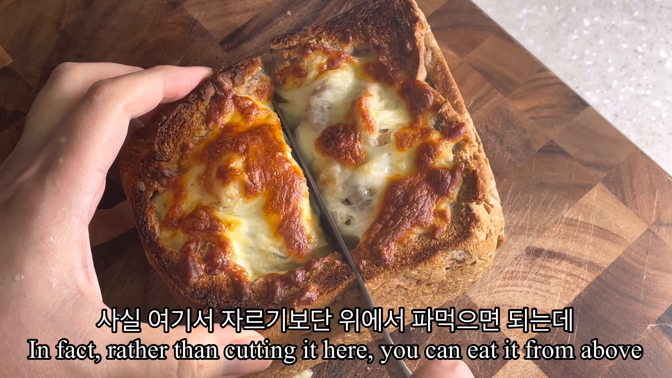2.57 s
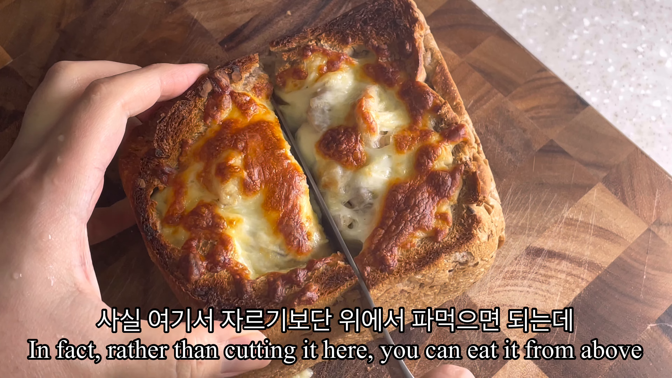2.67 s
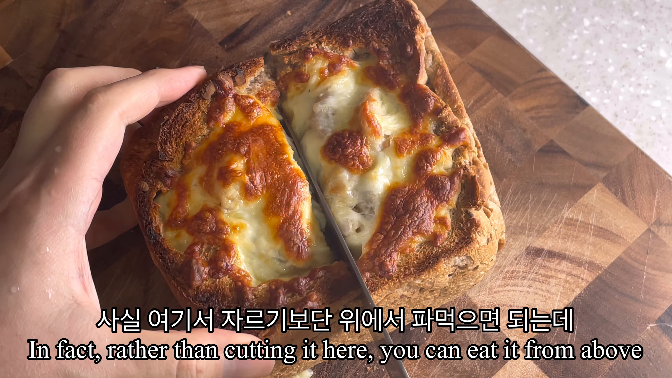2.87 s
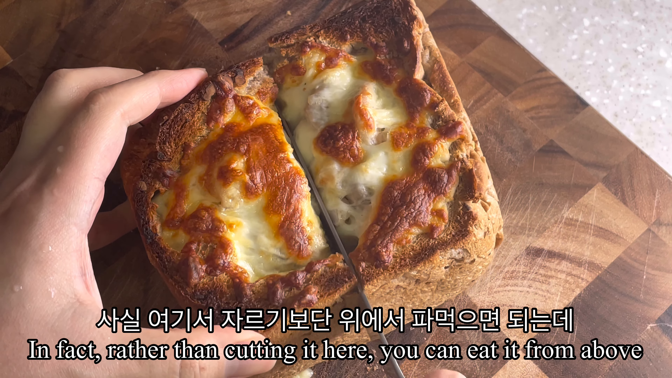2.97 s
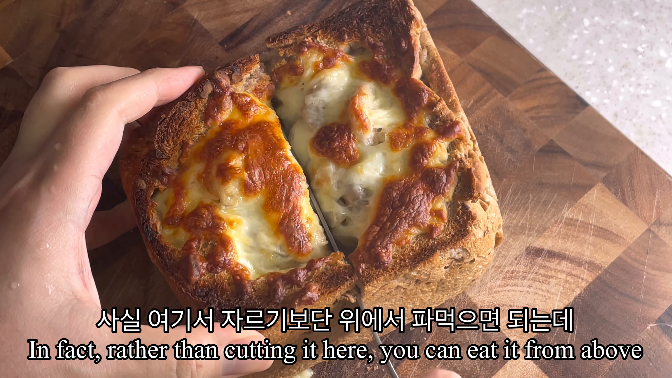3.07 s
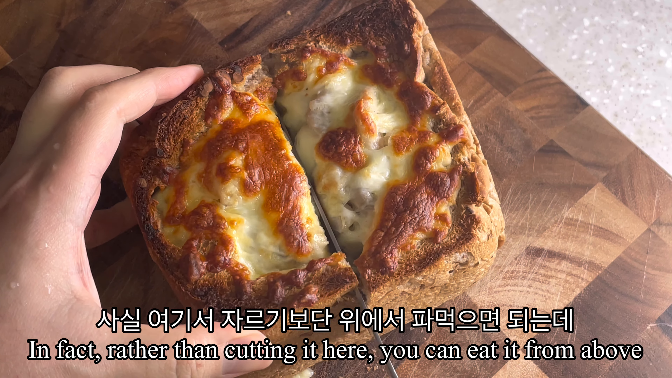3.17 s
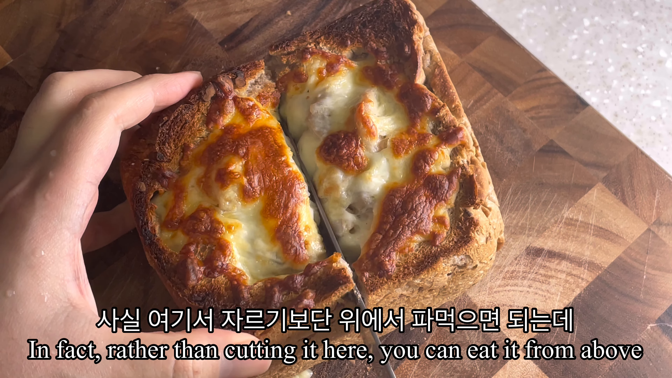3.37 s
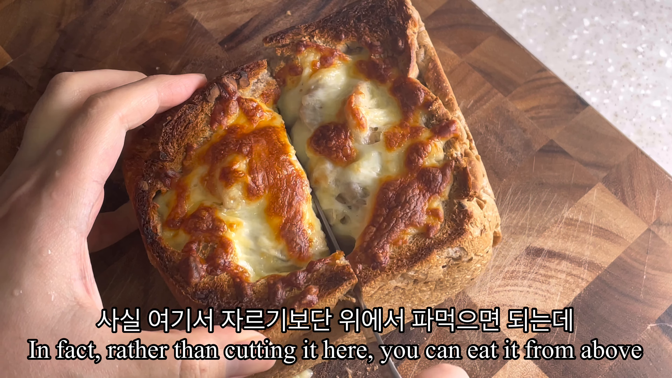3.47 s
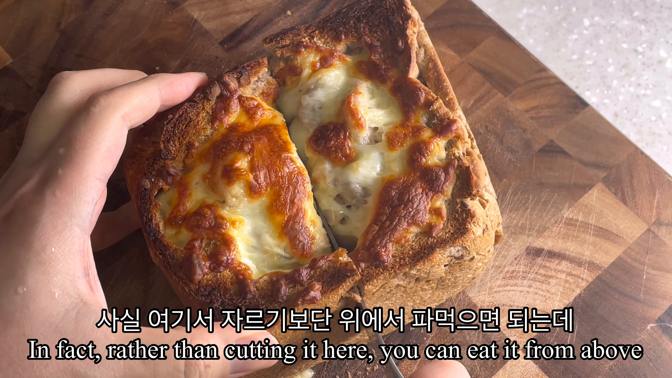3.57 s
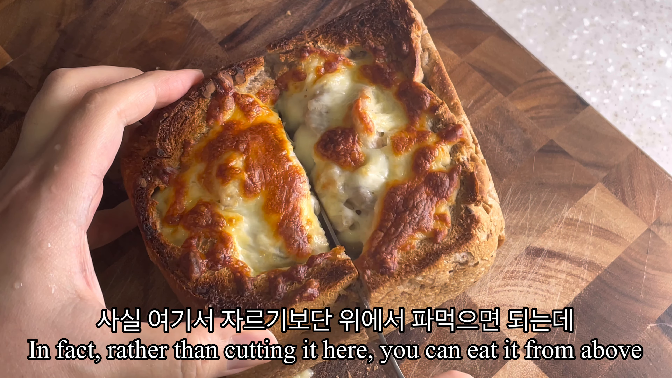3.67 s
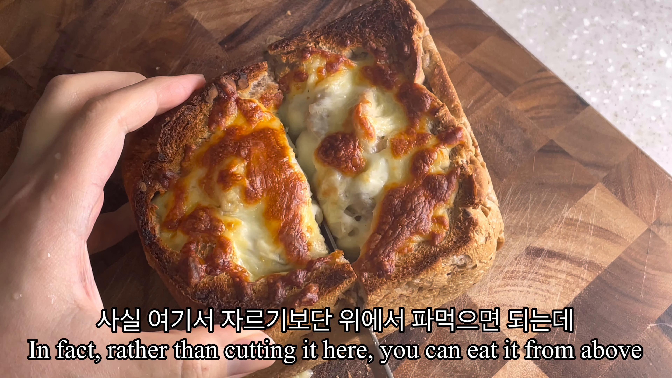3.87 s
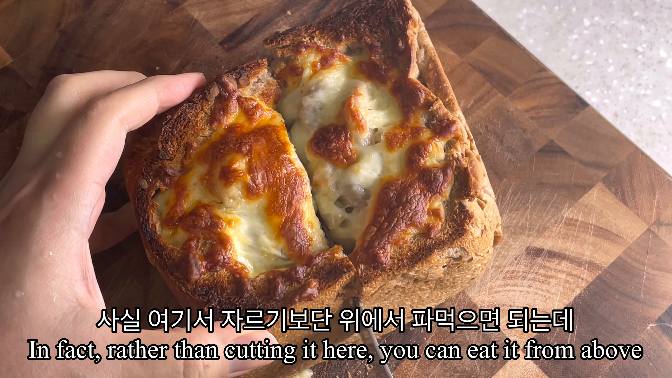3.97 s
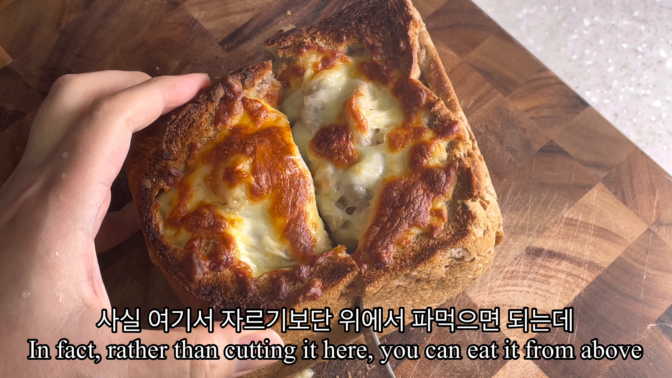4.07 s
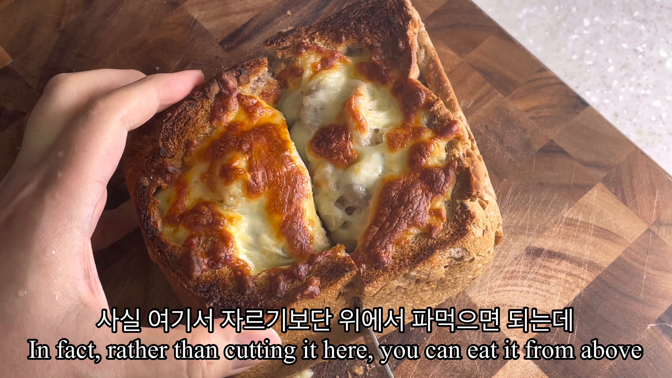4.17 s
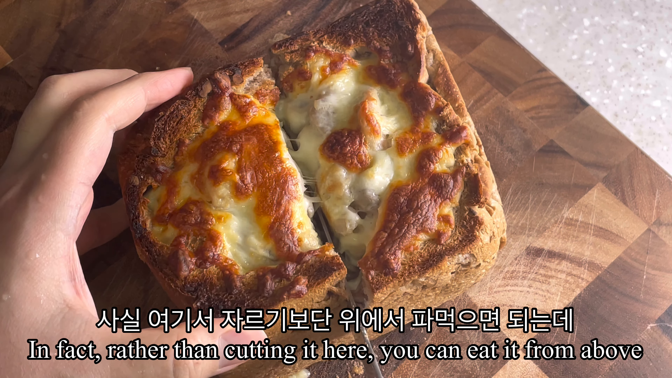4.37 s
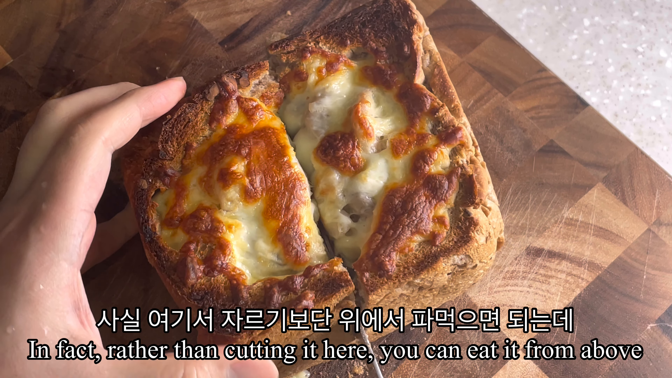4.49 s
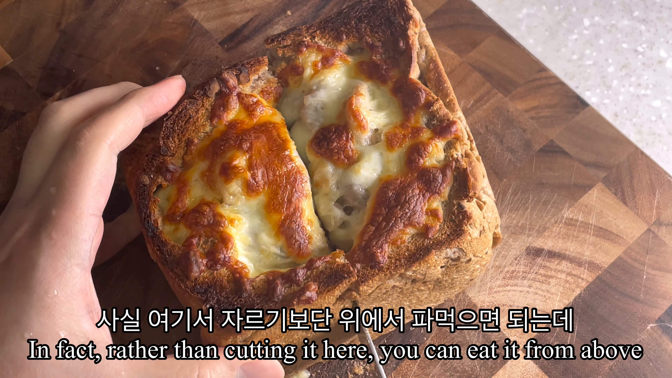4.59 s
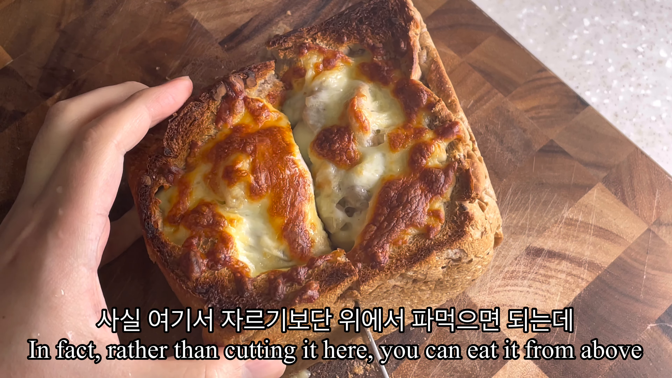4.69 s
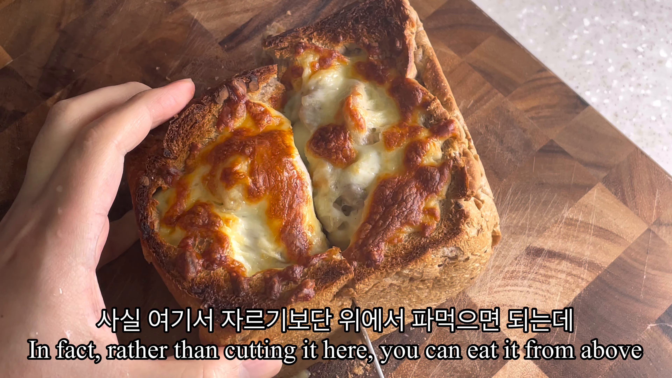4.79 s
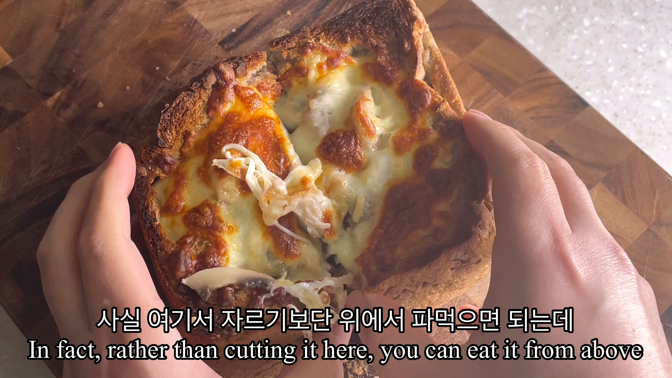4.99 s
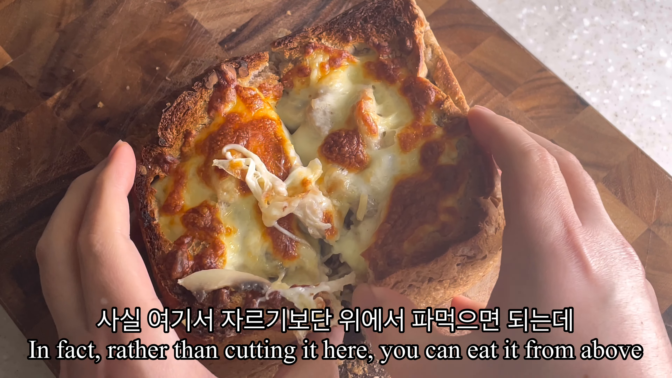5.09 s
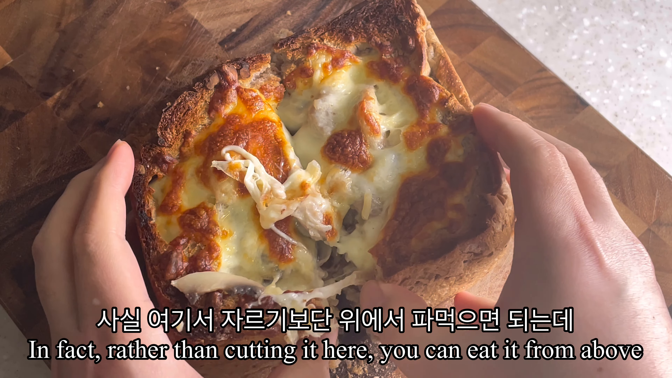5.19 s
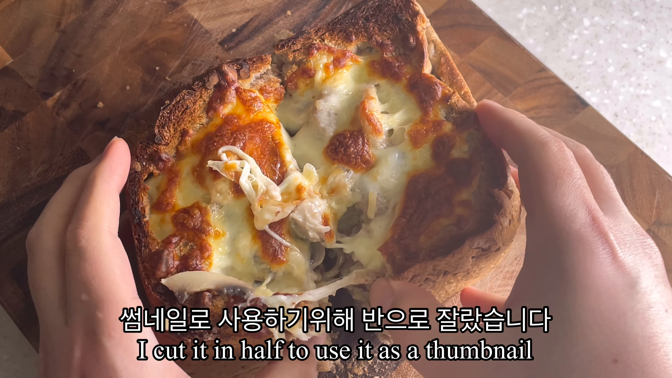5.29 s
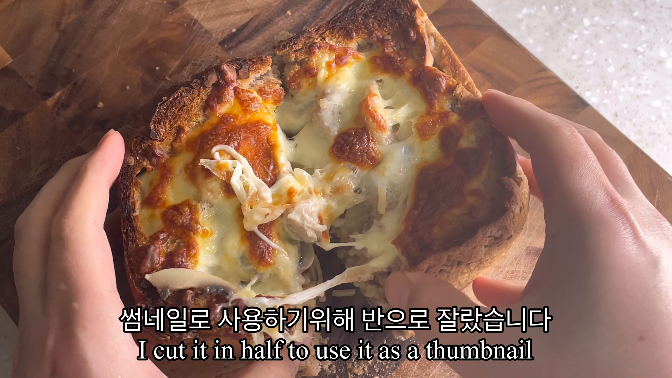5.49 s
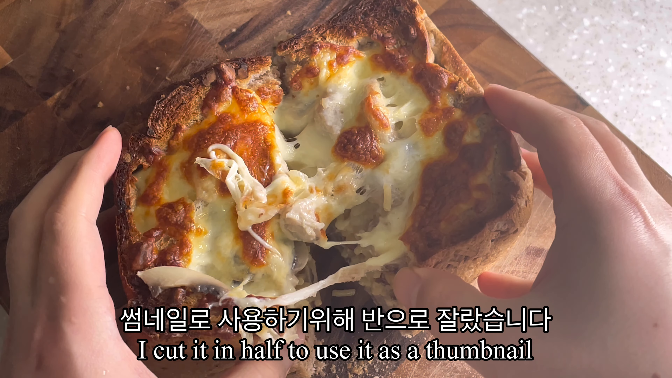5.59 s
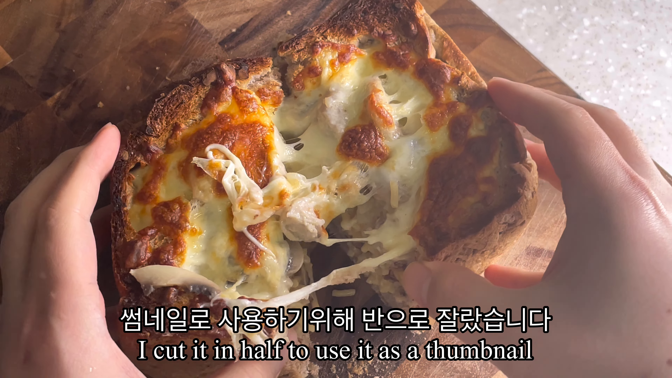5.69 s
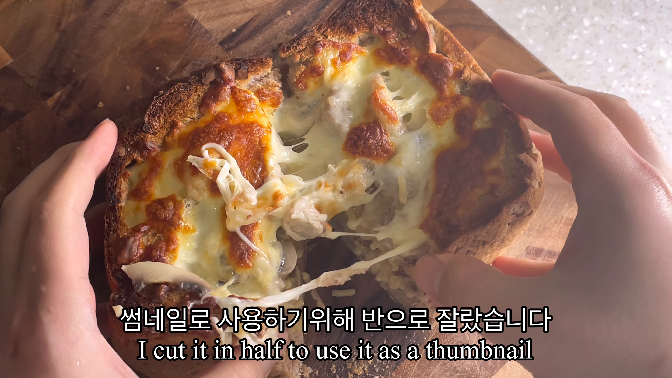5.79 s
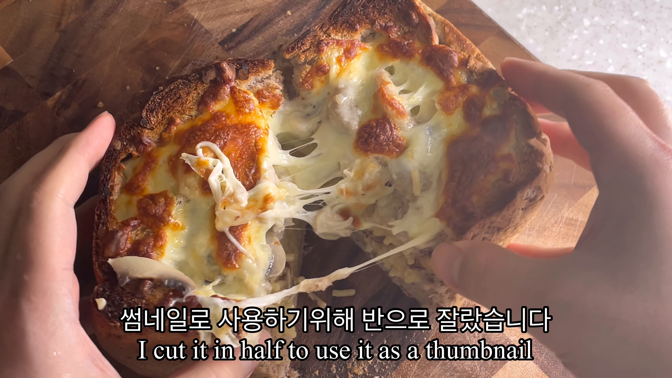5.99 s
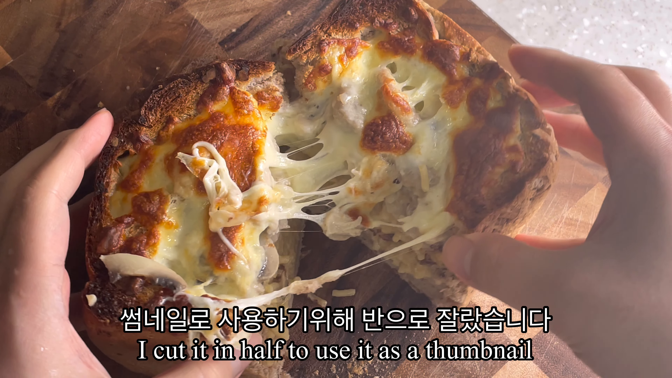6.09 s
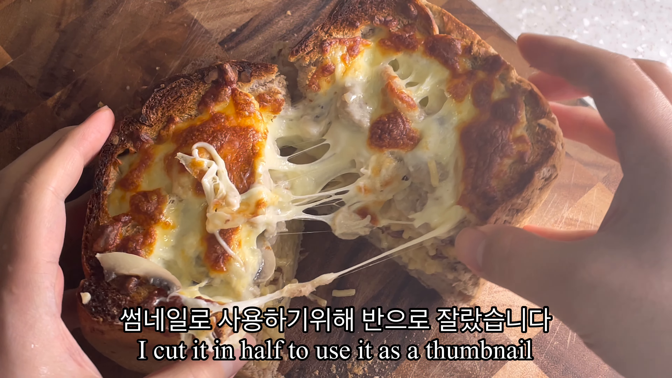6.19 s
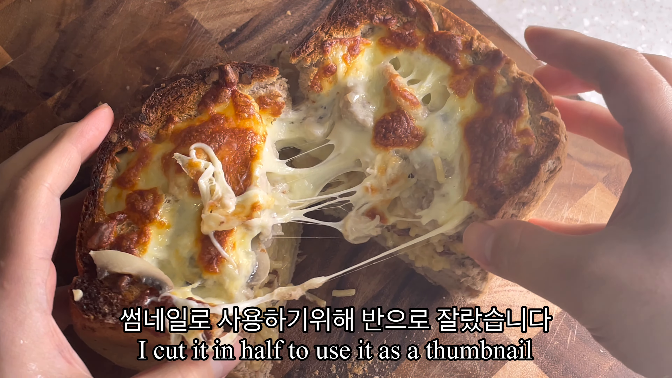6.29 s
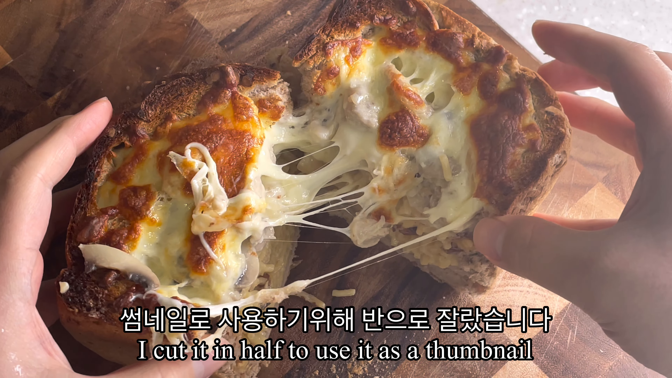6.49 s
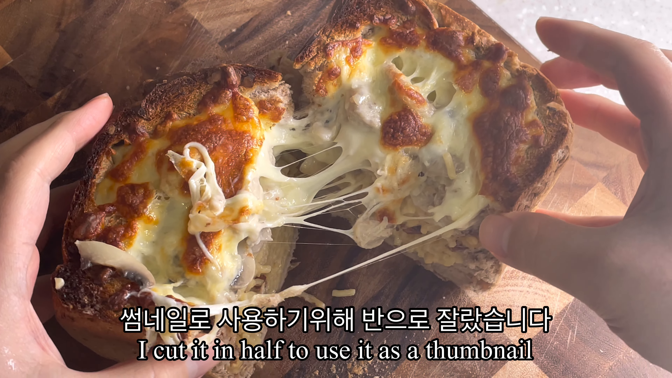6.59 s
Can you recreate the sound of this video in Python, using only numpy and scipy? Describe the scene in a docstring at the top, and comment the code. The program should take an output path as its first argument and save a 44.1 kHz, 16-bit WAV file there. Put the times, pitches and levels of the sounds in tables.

```python
"""A kitchen knife saws through the toasted crust of a cheese-filled loaf on a wooden board, close by.
First fingers rustle faintly on the loaf; the level dips briefly, then the edge ticks on the crust.
It breaks in and crunches through stroke after stroke: brittle cracks filtered by crust, loaf and
blade, while the board thuds as a set of damped modes driven by the load.
After a second brief dip the halves are drawn apart with a rustle and a few soft clicks."""
import sys
import numpy as np
from scipy import signal
from scipy.fft import rfft, irfft
from scipy.io import wavfile
from scipy.ndimage import uniform_filter1d

SR = 44100
rng = np.random.default_rng(int(sys.argv[2]) if len(sys.argv) > 2 else 0)


def int16_out(signal):
    """Quantize to a 16-bit WAV file."""
    q = np.round(np.clip(np.atleast_2d(signal).T, -1, 1) * 32767)
    wavfile.write(sys.argv[1], SR, q.astype(np.int16))


N = 292824
TIME = np.arange(N) / SR
USUAL_CRUNCH_DB = -42  # an ordinary push
BITE_DB_PER_S = 617.5  # rise of every push and grip

# the blade stays in the loaf between pushes, dragging lightly: [start t/s, duration/s]
IN_LOAF = (1.4, 3.72)
DRAG_DB, DRAG_BODY_DB, DRAG_TREBLE_DB, DRAG_THUD_DB = -66, -3.5, -5.5, -67.5
SAG_DB_PER_S, RELEASE_DB_PER_S = 9, 275.5
# the board answers a little later and settles more slowly
THUD_LAG_S, THUD_RELEASE_DB_PER_S = 0.019, 181.5
# pushes of the knife: [full force at t/s, held/s, crunch level/dB, body re middle/dB,
# treble re middle/dB, thud level/dB], before the overall band balance
STROKES = [(0.935, 0.13, -70, -15, 0, -50), (1.223, 0.01, -33.5, -7.5, -4, -36.5),
           (1.28, 0.13, -47, -6, -5, -47), (1.387, 0.064, -43.5, -3.5, -8, -45.5),
           (1.606, 0.048, -40.5, -7.5, -4.5, -36.5), (1.79, 0.023, -53, -5.5, -2.5, -66),
           (1.988, .11, -37, -6.5, -5, -32), (2.21, 0.1, -59, -17, -3.5, -70),
           (2.477, 0.042, -43, -3, -6, -35), (2.535, 0.1, -41.5, 0, -9, -32.5),
           (2.72, 0.1, -62.5, -5.5, -10, -51.5), (3.021, .07, -43, -0.5, -7.5, -36),
           (3.209, 0.018, -48.5, -6, -4, -46), (3.251, 0.021, -44, -17.5, -3.5, -51),
           (3.437, 0.004, -52, -0.5, -4, -33.5), (3.491, 0.01, -45, -1, -12, -44),
           (3.54, 0.06, -47, -1.5, -10.5, -36), (3.69, 0.15, -54.5, -4, -9.5, -50.5),
           (3.923, 0.19, -42.5, -4.5, -9.5, -38), (4.248, 0.1, -52, -6.5, -9, -52.5),
           (4.445, 0.013, -65.5, 0, -14, -48.5), (4.572, 0.24, -51, -3.5, -8.5, -44.5),
           (4.795, 0.049, -46.5, -5, -6.5, -38)]


def effort():
    """Superposition of powers: pushes over a light drag, as gains of body, middle, treble and load."""
    drag_db = [DRAG_DB + DRAG_BODY_DB, DRAG_DB, DRAG_DB + DRAG_TREBLE_DB, DRAG_THUD_DB]
    start_s, duration_s = IN_LOAF
    in_loaf = (TIME > start_s) & (TIME < start_s + duration_s)
    power = np.outer(from_db(drag_db) ** 2, in_loaf)
    for s, held_s, db, body_db, treble_db, thud_db in STROKES:
        push = swell(s, held_s, SAG_DB_PER_S, RELEASE_DB_PER_S)
        power[:3] += np.outer(from_db([db + body_db, db, db + treble_db]), push) ** 2
        answer = swell(s + THUD_LAG_S, held_s, SAG_DB_PER_S, THUD_RELEASE_DB_PER_S)
        power[3] += (from_db(thud_db) * answer) ** 2
    return np.sqrt(power)


def sawing(full, crunch, bright):
    """Rate of brittle failure: a harder stroke breaks more cells per second; each band follows its gain."""
    cracks_per_s = 3600 * np.sqrt(crunch / from_db(USUAL_CRUNCH_DB))
    grains = crumbling(cracks_per_s, spread_db=3.0, clump_db=3.0, own_db=4.5, wander_db=2.5)
    body, middle, treble = [evened(band, size=1800) for band in three_bands(grains, 1780, 4900)]
    return from_db(-3.5) * full * body + crunch * middle + from_db(-1.0) * bright * treble


# colour of breaking crust: [f/Hz, relative spectrum level/dB]
CRUST = [(80, -26.5), (130, -11.5), (190, 2.5), (280, -3.5), (420, -6), (760, -6), (920, -0.5),
         (1970, -4.5), (2700, -1), (3750, -3.5), (4700, -14), (5850, -9), (6730, -15), (8500, -15.5),
         (12000, -18.5), (16000, -27)]


def crumbling(per_s, spread_db, clump_db, own_db, wander_db):
    """Impulse excitation of resonators: clumped cracks ring in bands whose shares differ and wander."""
    clicks = cracks(per_s, spread_db, N) * from_db(clump_db * drift(61))
    out = 0.16 * clicks
    for hz in np.geomspace(330, 13500, num=18):
        own_share = 1 + from_db(own_db) * rng.standard_normal(N)
        share = clicks * own_share * rng.choice([-1, 1])
        wander = from_db(wander_db * drift(18))
        out = out + resonance(share, hz, 0.31 * hz) * wander
    return through(out, response(CRUST))


# single clicks and cracks of the crust, loud and faint: edge ticks, fractures under the knife,
# handling clicks; before loaf and room act on them:
# [t/s, level/dB, flake f/Hz, body re middle/dB, treble re middle/dB]
SNAPS = [(0.419, -52.5, 1050, 1, -5), (0.925, -33, 2440, 0.5, -3), (0.989, -41, 2330, -2, 6),
         (1.04, -34.5, 1900, 0, 3.5), (1.088, -38, 3580, -16, 7.5), (1.169, -42.5, 2550, -21, 2),
         (1.218, -20.5, 2700, -10, -1), (1.226, -24, 3700, -17.5, 2), (1.23, -24, 1450, -3.5, 3),
         (1.235, -28, 3550, -19.5, 3.5), (1.557, -37, 3430, 0, 0.5), (1.609, -38.5, 2250, 1, -8),
         (1.953, -40, 1760, -4, 0), (1.986, -32.5, 3420, 0, 7), (1.997, -27, 2480, -2, 1),
         (2.075, -34, 2670, 10, 4), (2.141, -36.5, 2350, -2, 0), (2.301, -46, 2400, -17, -8),
         (2.378, -51, 2490, -20, -10), (2.416, -50, 2797, -8, 1), (2.476, -37, 3440, 2, 2),
         (2.536, -31, 3300, 3.5, -1), (2.711, -40, 2280, -5, 0.5), (2.886, -47.5, 2560, -12, -23),
         (2.953, -37, 2380, -13, -16), (3.031, -27, 2900, -1, 0.5), (3.202, -40, 2640, -9.5, -11),
         (3.248, -31, 2250, -30, 1), (3.433, -33, 2700, -5, 3.5), (3.541, -33.5, 1170, -3, -14),
         (3.588, -38, 3250, -14, -2), (3.611, -37, 3380, -5, 0), (3.689, -39, 1880, -6, -6),
         (3.805, -43.5, 2650, -20, -9.5), (3.867, -36, 2630, -22, -18), (3.972, -32.5, 3300, -15, -9),
         (4.1, -33.5, 3260, -2, 1), (4.279, -41, 2380, -8, -14), (4.335, -36.5, 3600, -18, -16),
         (4.44, -40.5, 2500, -10, 0.5), (4.523, -46, 2370, -1.5, 0.5), (5.153, -58.5, 1865, -18, 4.5),
         (5.174, -58.5, 6150, -10, 19), (5.284, -39.5, 2400, -12.5, -4), (5.39, -43.5, 1000, 3, -1.5),
         (5.717, -50, 2670, -10, 4), (5.784, -52.5, 1040, 4, 9), (6.144, -56.5, 2478, -4, 0)]


def single_snaps():
    """Sudden release of strain energy: single clicks and cracks of the crust, loud and faint."""
    return snaps(SNAPS, splinter_db=-20, splinter_t60=0.021, flake_db=4.5, flake_width=0.16)


# smaller chips: mean rate, level at an ordinary push, dB per dB of pressure, spread
CHIPS_PER_S, CHIP_DB, CHIP_FOLLOWS, CHIP_SPREAD_DB = 30, -45.5, 0.62, 3
# their colour, and how much it differs from chip to chip
CHIP_HZ, CHIP_SPREAD_OCTAVES, CHIP_BODY_DB = 2560, 0.44, -7
CHIP_TREBLE_DB, CHIP_COLOUR_SPREAD_DB = -3.5, 5.5


def chips(pressure, count=200):
    """Random fracture under load: small chips pop at chance times, louder as blade and fingers press."""
    size, pitch, body, treble = rng.standard_normal((count, 4)).T
    s = np.cumsum(rng.uniform(.2, 1.8, count)) / CHIPS_PER_S
    push_db = 20 * np.log10(np.interp(s, TIME, pressure) + 1e-9) - USUAL_CRUNCH_DB
    level_db = CHIP_DB + CHIP_FOLLOWS * push_db + CHIP_SPREAD_DB * size
    flake_hz = CHIP_HZ * 2 ** np.clip(CHIP_SPREAD_OCTAVES * pitch, -2, 2)
    body_db = CHIP_BODY_DB + CHIP_COLOUR_SPREAD_DB * body
    treble_db = CHIP_TREBLE_DB + CHIP_COLOUR_SPREAD_DB * treble
    rows = np.column_stack([s, level_db, flake_hz, body_db, treble_db])
    return snaps(rows, splinter_db=-14.5, splinter_t60=0.012, flake_db=8, flake_width=0.065)


def snaps(rows, splinter_db, splinter_t60, flake_db, flake_width,
          creak_db=-42, creak_s=.004, yield_s=0.0008):
    """Brittle fracture: a creak, the break, a dying shower of splinters and a briefly ringing flake."""
    out, crust, lead = np.zeros(N + SR), response(CRUST), round(creak_s * SR)
    age = TIME[:len(crust)] - TIME[lead]
    shower = from_db(np.where(age < 0, creak_db, splinter_db - 60 * age / splinter_t60))
    for s, level_db, flake_hz, body_db, treble_db in rows:
        burst = shower * rms_one(cracks(7000, 1.2, len(age)))
        burst[lead] = 1  # the break itself
        body, middle, treble = three_bands(through(burst, crust), 1300, 5500)
        burst = from_db(body_db) * body + middle + from_db(treble_db) * treble
        flake = resonance(burst, flake_hz, flake_width * flake_hz)
        burst = burst + from_db(flake_db) * flake
        # level is that of the loudest 2 ms
        peak = np.sqrt(uniform_filter1d(burst ** 2, size=88, mode="constant").max())
        start = np.clip(round((s + yield_s) * SR) - lead, 0, N)
        out[start:start + len(age)] += from_db(level_db) * burst / peak
    return out[:N]


# resonances of loaf, blade and board: [f/Hz, bandwidth/Hz, gain at resonance/dB]
BODY = [(294, 13, 7.5), (331.4, 40, 7.5), (944, 180, 3), (1335, 50, -2), (1471, 81, 5.5), (2430, 200, 1),
        (2830, 54, -1.5), (3210, 72, -2.5), (3200, 54, 2.5), (3750, 70, 2), (4200, 75, 1), (6040, 140, 0),
        (7150, 28, 6.5)]


def body_resonances(crust):
    """Modal colouring: loaf, blade and board boost or cut narrow bands of the crust sound."""
    return crust + sum((from_db(db) - 1) * resonance(crust, hz, width) for hz, width, db in BODY)


# ringing modes of the steel blade: [f/Hz, relative level/dB, t60/s]
BLADE = [(3424, -1.5, 0.13), (5870, -18.5, 0.084), (7180, -20, 0.14), (8495, -10.5, 0.11),
         (11470, -20.5, 0.065)]


def blade(force, ring_db=-46, damped_s=0.92, damped_db=-12):
    """Free vibration: snaps set the steel modes ringing, more weakly from the first edge ticks on."""
    force, out = force * from_db(damped_db * (TIME > damped_s)), 0
    age = TIME[:SR // 4]
    for hz, db, t60 in BLADE:
        out = out + from_db(ring_db + db - 60 * age / t60) * np.sin(2 * np.pi * hz * age)
    return through(force, out)


GRIP_RELEASE_DB_PER_S = 167
# fingers shifting the loaf: [full force at t/s, held/s, rustle level/dB]
GRIPS = [(0.35, .02, -74.5), (0.416, 0.006, -70), (5.05, 1.2, -73), (5.7, 0.11, -66.5), (6.05, 0.16, -66.5),
         (6.25, .08, -73.5)]


def grip_force():
    """Superposition of powers: the gains of all finger grips together."""
    power = 0
    for s, held_s, db in GRIPS:
        power = power + (from_db(db) * swell(s, held_s, 0, GRIP_RELEASE_DB_PER_S)) ** 2
    return np.sqrt(power)


def handling(grip):
    """Friction as a train of micro-impacts: crust rustles faintly under the fingers and on the wood."""
    rustle = butter(through(cracks(4000, 2.3, N), response(CRUST)), 4400, "low")
    return grip * rms_one(rustle)


def board(load, sway_db=5.5, sway_hz=26.81, sway_width_hz=0.9, steadied_s=3.8, steadied_db=-14):
    """Forced vibration of damped modes: the load shakes the board; the table under it sways on."""
    push = butter(butter(rng.standard_normal(N), 83.3, "low", order=8), 30, "high")
    modes = resonance(push, 44, 26) + resonance(push, 66, 13) + resonance(push, 85.7, 5.3)
    shake = evened(0.72 * push + modes, size=1800)
    # the table is rocked less after the first, heavy strokes
    rocking = evened(butter(rng.standard_normal(N), [20, 34], "band"), size=6000)
    rocking = load * from_db(steadied_db * (TIME > steadied_s)) * rocking
    return load * shake + from_db(sway_db) * resonance(rocking, sway_hz, sway_width_hz)


def kitchen(x, near_db=-6.0, near_t60=0.027, room_db=-16, room_t60=0.23, wall_hz=7000):
    """Reverberation: quick reflections from board and worktop, then a longer, duller room tail."""
    age = TIME[:SR // 2]
    near = rng.standard_normal(len(age)) * from_db(-60 * age / near_t60) * (age > .001)
    tail = butter(rng.standard_normal(len(age)), wall_hz, "low")
    tail = tail * from_db(-60 * age / room_t60) * (age > .006)
    # energies relative to the direct sound
    echoes = from_db(near_db) * near / np.linalg.norm(near)
    echoes = echoes + from_db(room_db) * tail / np.linalg.norm(tail)
    echoes[0] = 1  # direct sound
    return through(x, echoes / np.linalg.norm(echoes))


AIR_DB = -64  # rms
# quiet kitchen: [f/Hz, relative spectrum level/dB]
AIR = [(12, -34), (20, -1), (77, -1), (187, -14.5), (319, -12.5), (558, -19.5), (660, -16), (1120, -22.5),
       (2530, -28), (2750, -26), (3740, -30), (14700, -33), (16000, -34.5)]


def still_air():
    """Stationary random noise: white noise shaped to the spectrum of a quiet kitchen."""
    return from_db(AIR_DB) * rms_one(through(rng.standard_normal(N), response(AIR)))


def cracks(per_s, spread_db, size):
    """Random failure of brittle cell walls: many small clicks and a few large ones."""
    sizes = from_db(spread_db * np.minimum(rng.exponential(1, size), 4.5))
    return sizes * rng.choice([-1, 1], size) * (rng.random(size) < per_s / SR)


def swell(start_s, held_s, sag_db_per_s, release_db_per_s):
    """Exponential growth and decay: gain of one push as it bites, sags while held and lets go."""
    age = TIME - start_s
    bite_db = BITE_DB_PER_S * np.clip(age, -1, 0)
    sag_db = sag_db_per_s * np.clip(age, 0, held_s)
    release_db = release_db_per_s * np.clip(age - held_s, 0, 1)
    return from_db(bite_db - sag_db - release_db)


def resonance(x, hz, width_hz):
    """Simple resonator: two poles set frequency and bandwidth, with about unit gain at the peak."""
    r = np.exp(-np.pi * width_hz / SR)
    zeros = np.array([1, 0, -1]) * (1 - r * r) / 2
    poles = [1, -2 * r * np.cos(2 * np.pi * hz / SR), r * r]
    return signal.lfilter(zeros, poles, x + 1e-18)


def response(spectrum, size=4096):
    """Minimum phase by the folded cepstrum: causal impulse response of unit energy."""
    hz, db = np.transpose(spectrum)
    grid = np.maximum(np.fft.rfftfreq(size, 1 / SR), 1)
    cepstrum = irfft(np.log(from_db(np.interp(np.log(grid), np.log(hz), db))))
    cepstrum[size // 2:] = cepstrum[0] = 0
    h = irfft(np.exp(rfft(2 * cepstrum)))
    return h / np.linalg.norm(h)


def through(x, h):
    """Linear system: convolution with an impulse response."""
    return signal.fftconvolve(x, h)[:len(x)]


def butter(x, hz, kind, order=2):
    """Butterworth filter: maximally flat passband."""
    return signal.sosfilt(signal.butter(order, hz, kind, fs=SR, output="sos"), x + 1e-18)


def three_bands(x, low_hz, high_hz):
    """Band analysis: body, middle and treble."""
    body = butter(x, low_hz, "low", order=3)
    middle = butter(x, [low_hz, high_hz], "band", order=3)
    return body, middle, butter(x, high_hz, "high", order=3)


def drift(hz):
    """Low-passed noise: slow chance with a spread of about one."""
    return rms_one(butter(rng.standard_normal(N + SR), hz, "low")[SR:])


def evened(x, size):
    """Level equalisation: hold the short-time rms at one."""
    return x / np.sqrt(np.abs(uniform_filter1d(x ** 2, size=size)) + 1e-12)


def rms_one(x):
    """Normalisation to unit rms."""
    return x / np.sqrt(np.mean(x ** 2) + 1e-20)


def from_db(db):
    """Decibel law: amplitude ratio of a level."""
    return 10 ** (np.asarray(db) / 20)


def scene(grip_thud_db=4.5):
    """Superposition: crust and blade in the kitchen, over the thudding board and the still air."""
    full, crunch, bright, load = effort()
    grip = grip_force()
    air = still_air()
    thuds = board(load + from_db(grip_thud_db) * grip)
    grains = sawing(full, crunch, bright) + handling(grip)
    breaks = single_snaps()
    crust = body_resonances(grains + breaks + chips(crunch + grip))
    return (kitchen(crust + blade(breaks)) + thuds + air)[None]


CUTOFF_HZ = 15850
# two brief dips in level: [lowest from t/s, fade-out/s, reopens at t/s, fade-in/s]
FADES = [(0.735, 0.041, 0.756, 0.13), (4.934, 0.0059, 4.955, 0.18)]


def record(dry, closed_db=-50):
    """Amplitude modulation and band limiting: the level dips twice; a steep low-pass cuts the top."""
    for silent_s, out_s, reopen_s, in_s in FADES:
        opening = np.maximum((silent_s - TIME) / out_s, (TIME - reopen_s) / in_s)
        opening = np.clip(opening, 0, 1)
        dry = dry * np.maximum(opening ** 2, from_db(closed_db))
    return signal.sosfilt(signal.ellip(10, .2, 70, CUTOFF_HZ, fs=SR, output="sos"), dry)


dry = scene()
out = record(dry)
int16_out(out)
```